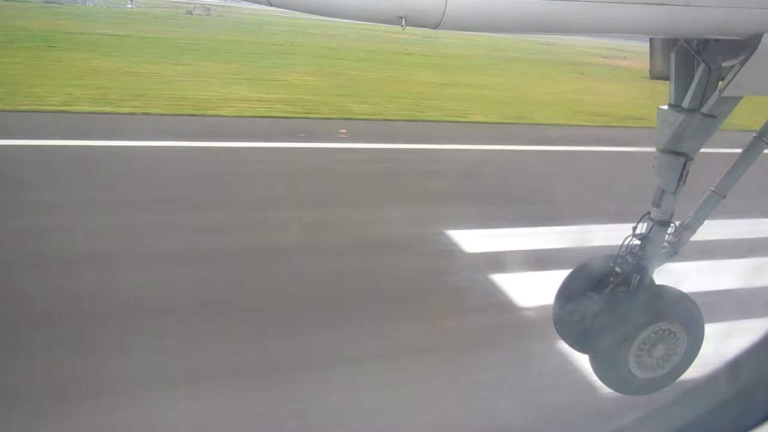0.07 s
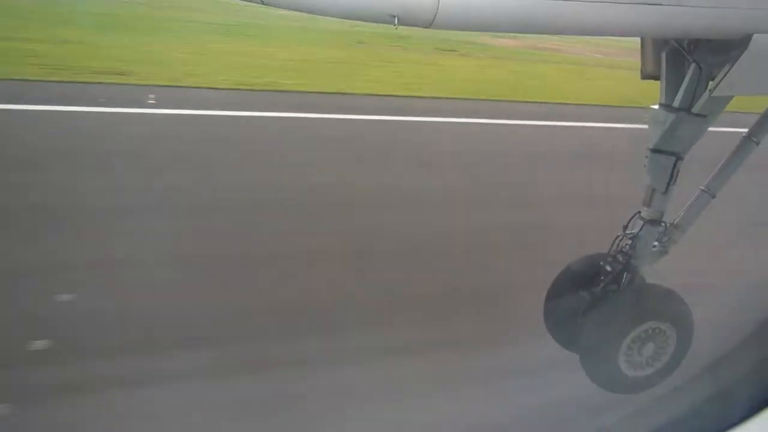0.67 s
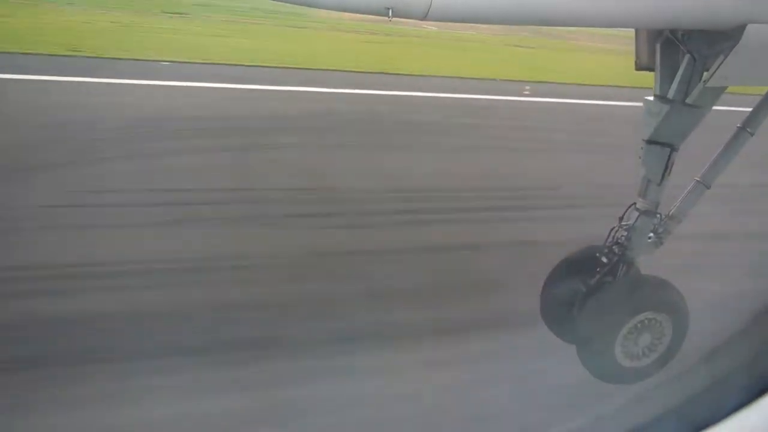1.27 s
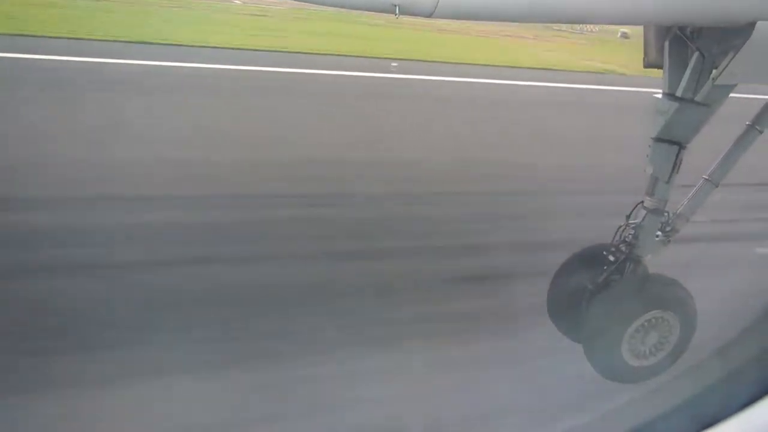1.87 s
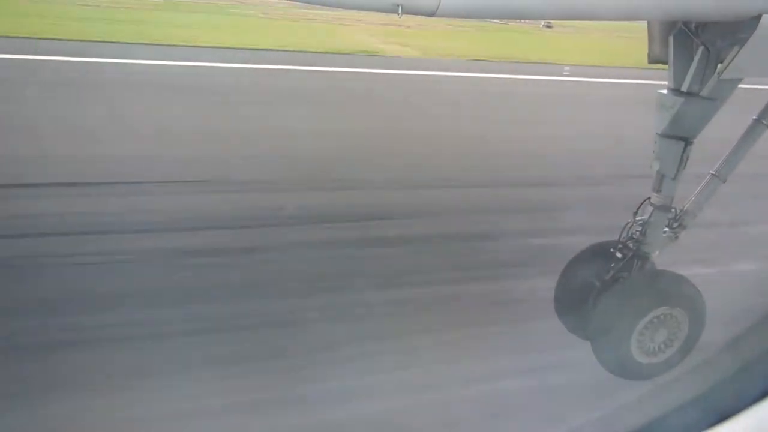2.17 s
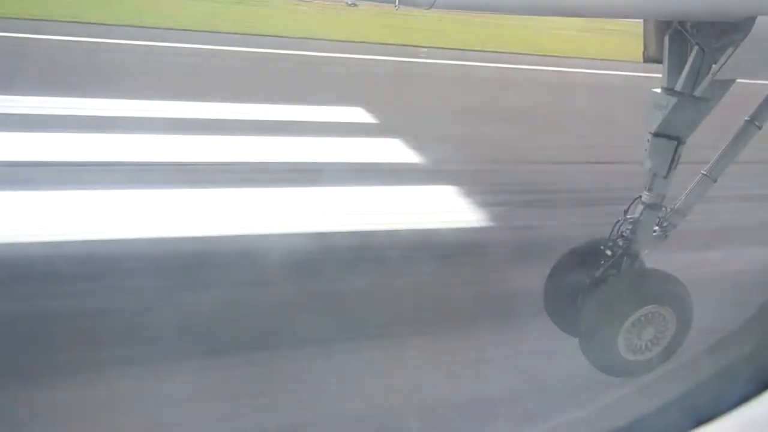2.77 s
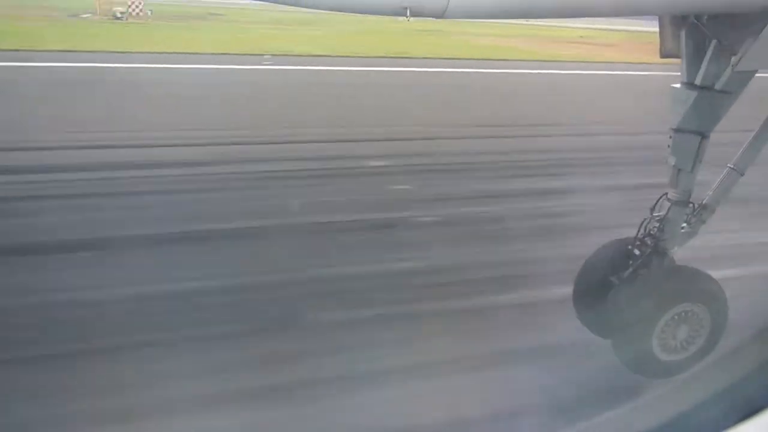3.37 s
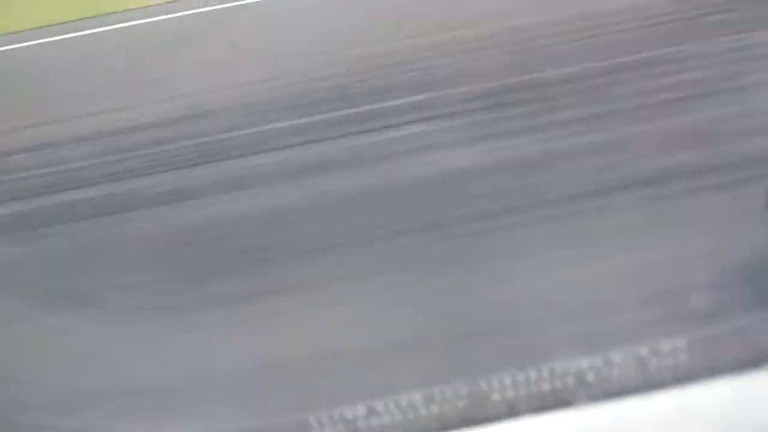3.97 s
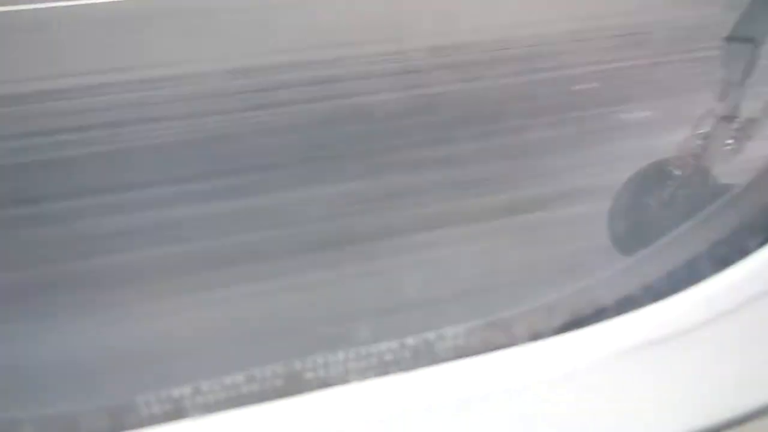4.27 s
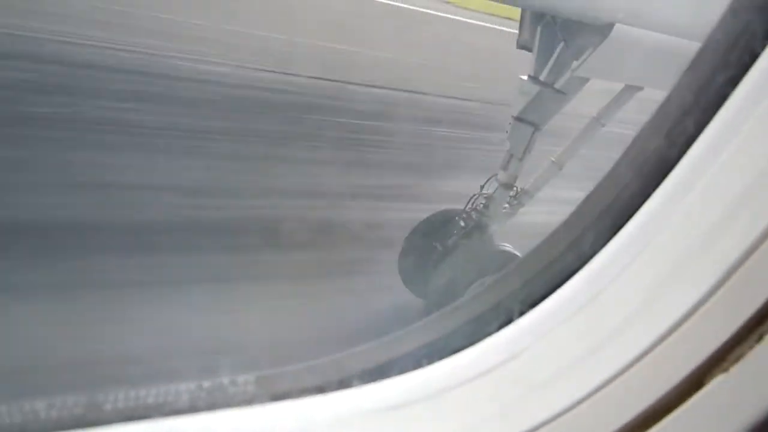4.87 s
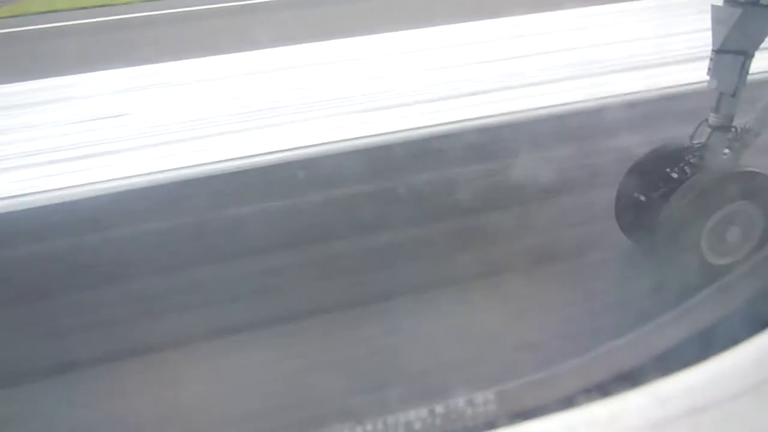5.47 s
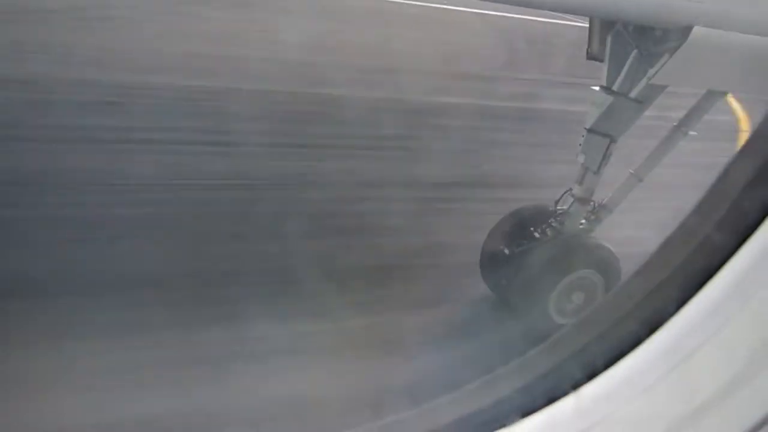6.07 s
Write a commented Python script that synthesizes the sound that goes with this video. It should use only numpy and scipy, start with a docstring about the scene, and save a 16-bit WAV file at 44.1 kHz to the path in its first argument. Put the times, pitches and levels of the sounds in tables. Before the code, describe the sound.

A low roar of air and a wavering engine drone fill an airliner cabin, heard from a window seat, with slow booming swells. A few faint clicks come in the first second, and a soft hiss of air near 1.9 seconds. At 3.5 seconds the first wheels touch down. The landing gear shudders deeply while loose panels clatter, small fittings rattle, latches knock and luggage bins thud. This is loudest from 3.6 to 4.3 seconds, when the rumble overloads the microphone and makes the rattle choppy and distorted. The shaking eases, and from 4.7 to 5 seconds a hydraulic actuator gives a short, rough moan on a steady middle pitch. At 5.2 seconds the other wheels land, bringing a lighter round of rattles, knocks and thuds. Tyres growl on the runway under scattered clatter, with one more short thud at about 6.1 seconds.

```python
"""Rushing air roars and two engines drone, heard from a window seat in a landing airliner.
At 3.5 s the first main wheels touch down, at 5.2 s the others: tyres growl, the landing gear
shudders, and the shaking makes the cabin's loose panels and fittings rattle, knock and thud.
In between, a hydraulic actuator moans as it lifts the spoilers, the brake flaps on the wing.
The rumble overloads the microphones, so each big swing is flattened and chops up the rattle."""
import sys
import numpy as np
from scipy import signal
from scipy.fft import rfft, irfft
from scipy.io import wavfile

SR = 44100
rng = np.random.default_rng(int(sys.argv[2]) if len(sys.argv) > 2 else 0)


def dump_mix(stems):
    """Bounce the given channels to the path in sys.argv[1] as a 16-bit WAV at rate SR."""
    frames = np.atleast_2d(stems).T  # one column per channel
    limited = np.clip(frames, -1, 1)  # hard clip at full scale
    pcm = np.round(limited * 32767).astype(np.int16)
    wavfile.write(sys.argv[1], SR, pcm)


N = 270333
TIME = np.arange(N) / SR
FREQUENCIES = np.fft.rfftfreq(N, 1 / SR)

# A "colour" says how strong a noise is from bass to treble. A "t60" is the time to fade by 60 dB.
# Levels compare the rows of a table; the functions set the final loudness.
# air roaring through the cabin wall: (frequency [Hz], level [dB])
ROAR_COLOUR = [(15, -18.5), (35, -11), (65, 1.1), (100, 0), (160, -3), (240, -8), (370, -8.5), (520, -20),
               (800, -25), (1250, -35), (1800, -39), (3400, -49), (3900, -57), (13000, -59), (13900, -93)]
# the wake, churned air behind the flaps and gear: (frequency [Hz], level [dB])
WAKE_COLOUR = [(85, -74), (115, 8), (132, 3), (165, 8.5), (195, 2.5), (240, 8), (290, -19.5), (420, -54.5)]
# the wake booms louder as the runway comes close: (time [s], level [dB])
WAKE_LEVEL = [(0, -14), (2.55, -18.5), (2.9, -11.5), (4.7, -14.5), (5.15, -19), (6.13, -17.5)]
# hum of the engines: (time [s], level [dB])
ENGINE_LEVEL = [(0, -17), (1.6, -14.5), (1.76, -11.5), (2.4, -12.5), (4.7, -14), (6.13, -24)]
# single knocks of latches and fittings:
# (time [s], level [dB], ring pitch [Hz], ring over crack [dB], left over right [dB])
LATCH_KNOCKS = [(0.193, -30, 8000, -8, 1), (0.476, -33, 3200, -1, -3), (0.65, -27.5, 4300, -21, -4),
                (3.5, -16, 3450, -5, -2), (3.544, -16.5, 5130, -11, -1), (3.633, -11.5, 9500, -3, 7),
                (3.663, -9.5, 5360, -14, 2), (3.671, -18, 10600, 3, -6), (3.8007, -15, 11500, -4, -7),
                (3.87, -14, 12600, -5, -1), (3.9553, -14, 11700, -2, -6.5), (3.982, -23, 12000, 4, 0),
                (4.037, -16, 10200, -1.5, 1), (4.078, -22, 9800, 5, 1), (4.3695, -22.5, 4960, 3.5, -7),
                (4.7195, -22, 10080, -2, 1), (4.942, -27.5, 4480, -14, -0.5), (5.211, -22, 12600, -3, -1),
                (5.32, -20.5, 5010, -6, -8), (5.4332, -16, 6600, -8, -7), (5.6944, -29, 3590, -8, -4),
                (5.7221, -30, 3490, -3, -6), (5.847, -29, 11300, -5, -3), (5.888, -28, 5200, 0, -3)]
# bright rattle of small parts: (frequency [Hz], level [dB])
SMALL_PART_COLOUR = [(300, -38), (1500, 19.5), (3000, 7.5), (5000, 9), (7500, 8), (10500, 7), (13000, 9),
                     (16000, -9)]
# lower rattle of large panels: (frequency [Hz], level [dB])
PANEL_COLOUR = [(150, -23), (500, 7.5), (950, 2.5), (1300, -4.5), (1600, 4.5), (1870, 1), (2020, -11),
                (2200, -4), (2800, -5.5), (4000, -11), (8000, -52)]
# brief low swells in the rumble: (peak time [s], half length [s], pitch [Hz], level [dB])
LOW_SWELLS = [(0.336, 0.022, 262, -9.5), (1.196, 0.14, 131, -14), (1.21, 0.046, 245, -14),
              (1.64, 0.1, 258, -15.5), (2.256, 0.06, 244, -11), (3.097, 0.46, 160, -18),
              (3.305, 0.072, 235, -12.5), (3.789, 0.016, 192, -7.5), (3.948, 0.021, 178, -7.5)]
# a puff of air before touchdown: (time [s], level [dB])
PUFF_LEVEL = [(1.74, -70), (1.82, -44), (1.88, -37.5), (1.94, -38.5), (1.99, -43), (2.05, -68)]
# hiss of that puff: (frequency [Hz], level [dB])
PUFF_COLOUR = [(2500, -13), (4500, -2), (5050, 4), (5600, 0), (6400, -4), (8000, -2), (8900, -1),
               (10000, -4), (11500, -3), (13500, -10), (14500, -28)]
# jolts that shake the trim, the cabin's lining: (time [s], length [s], small parts [dB], panels [dB])
TRIM_JOLTS = [(3.468, 0.054, -35.5, -28.5), (3.565, 0.016, -38, -25), (3.62, 0.02, -42, -20.5),
              (3.709, 0.033, -35, -18), (3.77, 0.12, -49, -29), (3.928, 0.041, -40, -25),
              (4.015, 0.015, -31.5, -39), (4.117, 0.02, -43, -26), (4.18, 0.046, -34, -26.5),
              (4.248, 0.018, -44, -35), (5.178, 0.097, -43.5, -47), (5.266, 0.12, -38, -51),
              (5.405, 0.0088, -34, -26)]
# one main gear lands, then the other, and each rolls on:
# (time [s], first heave [dB], tyre growl [dB], small parts [dB], panels [dB])
GEAR_LANDINGS = [(3.48, -6, -29.5, -54, -67), (5.17, -37, -22.5, -47, -35)]
# tyres growling on the runway: (frequency [Hz], level [dB])
GROWL_COLOUR = [(200, -0.5), (350, 19), (500, 2), (700, 7.5), (950, -10.5), (1300, -33), (2600, -20),
                (6000, -39)]
# the plane's body heaving on its struts, the legs of the gear: (frequency [Hz], level [dB])
BODY_HEAVE_COLOUR = [(6, 3), (16, 5.5), (28, 4.5), (50, 3.5), (75, -4.5), (150, -36), (400, -99)]
# swells of shudder in the gear: (peak time [s], half length [s], pitch [Hz], level [dB])
GEAR_SHUDDERS = [(3.6, 0.047, 81.85, -8.5), (3.698, 0.017, 70.1, 0.5), (3.758, 0.023, 68.04, 1.5),
                 (3.843, 0.023, 54.05, -3), (3.907, 0.021, 75.9, 1.5), (4.003, 0.02, 75, 0),
                 (4.199, 0.032, 61.92, 8.5), (5.214, 0.072, 56.01, -14), (5.363, 0.029, 79.6, -13),
                 (5.682, 0.091, 78.57, -15.5), (5.852, 0.11, 73.92, -16.5)]
# loose panels and luggage bin doors clattering:
# (time [s], hold [s], level [dB], t60 [s], ring pitch [Hz], ring over rattle [dB])
PANEL_CLATTERS = [(3.497, 0.008, -25, 0.077, 1900, -5), (3.66, 0.006, -13.5, 0.072, 1320, 0),
                  (3.714, 0.04, -31, 0.072, 1770, -1), (3.779, 0.07, -20, 0.14, 1890, -2.5),
                  (3.928, 0.038, -18.5, 0.25, 2020, -5.5), (4.034, 0.0052, -21, 0.03, 1860, 5.5),
                  (4.166, 0.04, -23, 0.25, 1400, -8), (5.258, 0.011, -31, 0.095, 940, -10),
                  (5.314, 0.008, -29, 0.078, 1450, -7), (5.364, 0.0084, -25.5, 0.097, 1770, -10),
                  (5.427, 0.013, -24.5, 0.059, 1590, 6.5), (5.459, 0.055, -34.5, 0.3, 1821, 1),
                  (5.673, 0.01, -32.5, 0.15, 1060, -3), (5.721, 0.006, -30, 0.062, 1847, -3)]
# the rattle in each clatter: (frequency [Hz], level [dB])
RATTLE_COLOUR = [(300, -28), (800, 6), (1150, 4.5), (1350, -2), (1610, -4), (1870, -3), (2020, -4),
                 (2200, -4.5), (2900, -6), (4000, -17), (8000, -17)]
# thuds of luggage bins and seat frames: (time [s], level [dB], t60 [s])
BIN_THUDS = [(3.66, -7.5, 0.092), (3.783, -13, 0.095), (3.815, -4.5, 0.091), (3.861, -16.5, 0.18),
             (3.934, -24, 0.1), (4.036, -14, 0.086), (4.121, -10, 0.08), (5.264, -9, 0.13),
             (5.429, -10, 0.07), (6.109, -2.5, 0.034)]
# dull sound of those thuds: (frequency [Hz], level [dB])
THUD_COLOUR = [(120, -9), (330, 35), (480, -1), (700, 26.5), (950, -43), (1300, -21), (1620, -16),
               (1850, -23), (2050, -28), (2400, -22), (3500, -24), (7000, -54)]
# the actuator moaning as the spoilers rise: (time [s], pitch [Hz], level [dB])
ACTUATOR_MOAN = [(4.70, 433, -42), (4.755, 437, -17), (4.83, 436.6, -17.5), (4.915, 437.2, -14.5),
                 (4.97, 424, -20)]
# fluid rushing through the actuator's valve: (frequency [Hz], level [dB])
FLUID_COLOUR = [(400, -18), (600, 7), (950, -5), (1400, -26), (3000, -49)]
# the microphones' own hiss: (frequency [Hz], level [dB])
MIC_HISS_COLOUR = [(100, -62), (3500, -1.5), (5000, -4), (8000, -7.5), (12000, -6.5), (13300, -38),
                   (13900, -34)]

LOAD_S = 0.046  # how quickly a gear takes the plane's weight


def from_db(db):
    """Turns decibels into a number to multiply by."""
    return 10 ** (np.asarray(db) / 20)


def unit(x):
    """Scales a signal to an average size (rms) of 1."""
    return x / np.sqrt(np.mean(x ** 2) + 1e-20)


def track(rows, column=1):
    """Joins the points of one table column with straight lines over time."""
    rows = np.array(rows)
    return np.interp(TIME, rows[:, 0], rows[:, column])


def tinted(x, colour):
    """Gives a signal a colour, at an average size of 1."""
    hz, db = np.transpose(colour)
    gain = from_db(np.interp(np.log(FREQUENCIES + 1), np.log(hz + 1), db))
    return unit(irfft(rfft(x) * gain, N))


def wander(rate_hz):
    """A smooth random wobble, mostly slower than rate_hz."""
    return unit(irfft(rfft(rng.standard_normal(N)) / (1 + (FREQUENCIES / rate_hz) ** 4), N))


def cabin_noise(colour, mic_gap_m=0.078, unshared=0.00018):
    """Noise reaching two microphones from all sides: alike in the bass, unrelated in the treble."""
    likeness = (1 - unshared) * np.sinc(2 * FREQUENCIES * mic_gap_m / 343)
    real, imaginary = rng.standard_normal((2, 2, len(FREQUENCIES)))
    mid, side = (real + 1j * imaginary) * np.sqrt([1 + likeness, 1 - likeness])
    return tinted(irfft([mid + side, mid - side], N), colour)


def attack(start, rise_s):
    """Climbs from 0 to 1 after start."""
    return 1 - np.exp(-np.maximum(TIME - start, 0) / rise_s)


def release(start, t60):
    """Holds 1 until start, then dies away."""
    return from_db(-60 * np.maximum(TIME - start, 0) / t60)


def bell(peak_s, half_s):
    """A smooth swell up to 1 and back."""
    return 1 / np.cosh(np.clip((TIME - peak_s) / half_s, -9, 9)) ** 2


def airflow(roar_db=-9, gust_db=0.5, surge_db=1.0):
    """Air roars over the plane's skin at a steady speed, while the wake booms in slow surges."""
    roar_gain = from_db(roar_db + gust_db * wander(rate_hz=11))
    roar = cabin_noise(ROAR_COLOUR) * roar_gain
    wake_gain = from_db(track(WAKE_LEVEL) + surge_db * wander(rate_hz=1.7))
    return roar + cabin_noise(WAKE_COLOUR) * wake_gain


def engines(pitch_hz=85.9, drift=0.03574, beat_hz=0.487, in_step_s=2.477, far_db=-7, waver_db=1.5):
    """Two off-balance shafts hum through the wing, swelling and fading as they slip in and out of step."""
    near_turns = np.cumsum(pitch_hz * (1 + drift * wander(rate_hz=8.88))) / SR
    far_turns = near_turns - beat_hz * (TIME - in_step_s)
    hum = np.sin(2 * np.pi * near_turns) + from_db(far_db) * np.sin(2 * np.pi * far_turns)
    return np.sqrt(2) * hum * from_db(track(ENGINE_LEVEL) + waver_db * wander(rate_hz=24))


def ringing(noise, hz, width_hz):
    """A part shaken by noise rings in a narrow band around its own pitch."""
    return unit(signal.lfilter(*signal.iirpeak(hz, hz / width_hz, SR), noise))


def knocks(level_db=-8, t60=0.072, width_hz=330, upper_ratio=1.26, upper_db=-6, panel_db=-5):
    """A latch knocks: a bright crack, a brief two-note ring and the thud of the panel behind it."""
    cracks = cabin_noise(SMALL_PART_COLOUR) + from_db(panel_db) * cabin_noise(PANEL_COLOUR)
    fade = release(0, t60)[:SR // 10]
    out = np.zeros((2, N))
    for start, db, hz, ring_db, left_db in LATCH_KNOCKS:
        span = slice(round(start * SR), round(start * SR) + len(fade))
        chatter = rng.standard_normal((2, len(fade)))
        lower = ringing(chatter, hz, width_hz)
        upper = ringing(chatter, hz * upper_ratio, width_hz)
        ring = from_db(ring_db) * (lower + from_db(upper_db) * upper)
        sides = from_db([[left_db / 2], [-left_db / 2]])
        out[:, span] += from_db(level_db + db) * sides * fade * (cracks[:, span] + ring)
    return out


def low_swells(drift=0.02923):
    """Brief low swells rise out of the rumble, each wavering around one pitch."""
    wavering_time = np.cumsum(1 + drift * wander(rate_hz=24.7)) / SR
    return np.sqrt(2) * sum(from_db(db) * bell(peak, half) * np.sin(2 * np.pi * hz * wavering_time)
                            for peak, half, hz, db in LOW_SWELLS)


def air_puff(right_db=3):
    """Escaping air hisses softly, a little to the right."""
    sides = from_db([[-right_db / 2], [right_db / 2]])
    return cabin_noise(PUFF_COLOUR) * from_db(track(PUFF_LEVEL)) * sides


def impacts(per_s, spread_db, t60):
    """The flickering loudness of many tiny hits of random size, each dying quickly."""
    hits = rng.random(N) < per_s / SR
    size = np.minimum(rng.exponential(1, N), 4)
    energy = hits * from_db(spread_db * size) ** 2
    fade = release(0, t60)[:SR // 5]
    return unit(np.sqrt(abs(signal.oaconvolve(energy, fade ** 2)[:N])))


def rolling(column):
    """The steady strength that each gear adds once it carries weight."""
    return np.sqrt(sum((from_db(row[column]) * attack(row[0], LOAD_S)) ** 2 for row in GEAR_LANDINGS))


def shaking(rise_s=0.015, stop_t60=0.28, settle_t60=1.9, settle_db=-10.5):
    """How hard the rolling wheels and the jolts shake the small parts and the panels."""
    power = np.array([rolling(column=3), rolling(column=4)]) ** 2
    for start, length, small_db, panel_db in TRIM_JOLTS:
        end = start + length
        # most parts stop quickly; a few settle slowly
        fade = release(end, stop_t60) + from_db(settle_db) * release(end, settle_t60)
        power += (from_db([[small_db], [panel_db]]) * attack(start, rise_s) * fade) ** 2
    return np.sqrt(power)


def trim_rattle(small_db=4, panel_db=0.5, gear_buzz_db=-36, moan_buzz_db=-21):
    """The shaken cabin lining rattles: small parts sizzle, large panels clatter lower."""
    small = cabin_noise(SMALL_PART_COLOUR) * impacts(per_s=1100, spread_db=0.5, t60=0.36)
    panels = cabin_noise(PANEL_COLOUR) * impacts(per_s=1400, spread_db=5.5, t60=0.17)
    small_shake, panel_shake = shaking()
    # small parts also buzz with the shuddering gear, panels with the actuator
    small_shake = from_db(small_db) * small_shake + from_db(gear_buzz_db) * np.tanh(swing_size())
    panel_shake = from_db(panel_db) * panel_shake + from_db(moan_buzz_db) * moan_strength()
    return small * small_shake + panels * panel_shake


def runway_rumble(heave_t60=2.6, rolling_db=-25):
    """The tyres growl, and the plane heaves on its struts, hardest just after touchdown."""
    heave = sum(attack(start, LOAD_S) * (from_db(db) * release(start, heave_t60) + from_db(rolling_db))
                for start, db, *_ in GEAR_LANDINGS)
    growl = cabin_noise(GROWL_COLOUR) * rolling(column=2)
    return growl + cabin_noise(BODY_HEAVE_COLOUR) * heave


def swing_size(tremor_db=-20.5):
    """How far the struts swing: smooth swells on top of a slight tremor from rolling."""
    swells = sum(from_db(db) * bell(peak, half) for peak, half, _, db in GEAR_SHUDDERS)
    return (swells + from_db(tremor_db)) * attack(GEAR_LANDINGS[0][0], LOAD_S)


def gear_shudder(jostle=0.16, flutter_db=2.2, snap=0.2):
    """The struts swing back and forth as the tyres spin up, and the runway jostles each swing."""
    pitch_hz = track(GEAR_SHUDDERS, column=2) * (1 + jostle * wander(rate_hz=50))
    phase = 2 * np.pi * np.cumsum(pitch_hz) / SR
    swing = swing_size() * from_db(flutter_db * wander(rate_hz=44))
    # large swings snap over, which adds higher tones
    overtones = snap * np.tanh(swing / 2) * (np.sin(3 * phase) + np.sin(5 * phase) / 2)
    return np.sqrt(2) * (np.sin(phase) + overtones) * swing


def clatters(rise_s=0.0036, width_hz=220):
    """A loose panel slaps its frame, chatters while it is shaken and rings down to rest."""
    rattle = cabin_noise(RATTLE_COLOUR)
    out = np.zeros((2, N))
    for start, hold, db, t60, hz, ring_db in PANEL_CLATTERS:
        first = round(start * SR)
        length = min(SR // 2, N - first)
        span = slice(first, first + length)
        burst = (attack(0, rise_s) * release(hold, t60))[:length]
        ring = ringing(rng.standard_normal((2, length)), hz, width_hz)
        out[:, span] += from_db(db) * burst * (rattle[:, span] + from_db(ring_db) * ring)
    return out * impacts(per_s=900, spread_db=3.0, t60=0.045)


def thuds(rise_s=0.00054):
    """Heavy fittings land against their stops and boom briefly."""
    blows = sum(from_db(db) * attack(start, rise_s) * release(start, t60) for start, db, t60 in BIN_THUDS)
    return cabin_noise(THUD_COLOUR) * blows


def moan_strength():
    """How loud the actuator is: it sounds only while it moves."""
    moving = (TIME > ACTUATOR_MOAN[0][0]) & (TIME < ACTUATOR_MOAN[-1][0])
    return from_db(track(ACTUATOR_MOAN, column=2)) * moving


def actuator(octave_db=-18, drift=0.00691, rough_db=1.2, fluid_db=-8):
    """Fluid rushes through a valve to lift the spoilers, with a short, rough moan."""
    pitch_hz = track(ACTUATOR_MOAN) * (1 + drift * wander(rate_hz=47))
    phase = 2 * np.pi * np.cumsum(pitch_hz) / SR
    moan = np.sqrt(2) * (np.sin(phase) + from_db(octave_db) * np.sin(2 * phase))
    fluid = cabin_noise(FLUID_COLOUR) * from_db(fluid_db)
    return (moan + fluid) * moan_strength() * from_db(rough_db * wander(rate_hz=58))


def scene():
    """Adds up all the sounds that reach the window seat."""
    flight = airflow() + low_swells() + engines() + air_puff()
    wheels = runway_rumble() + gear_shudder()
    return flight + wheels + trim_rattle() + clatters() + knocks() + thuds() + actuator()


def record(dry, ceiling=0.54, hardness=19.6, hiss_db=-53, top_hz=16100):
    """The overloaded microphones flatten big swings and add hiss; a filter then cuts the top treble."""
    # a trace of treble still rides on the flat tops
    treble = 0.12 * signal.sosfilt(signal.butter(2, 2200, "highpass", fs=SR, output="sos"), dry)
    swing = dry - treble
    flattened = treble + swing / (1 + abs(swing / ceiling) ** hardness) ** (1 / hardness)
    # the microphones cannot hold a steady value, so the flat tops tilt
    tilted = signal.lfilter(*signal.butter(1, 1.6, "highpass", fs=SR), flattened)
    hiss = from_db(hiss_db) * tinted(rng.standard_normal((2, N)), MIC_HISS_COLOUR)
    sides = from_db([[-0.3], [0.3]])
    treble_cut = signal.firwin(511, top_hz, window=("kaiser", 9), fs=SR)
    return signal.oaconvolve(tilted * sides + hiss, treble_cut[None], "same")


dry = scene()
out = record(dry)
dump_mix(out)
```